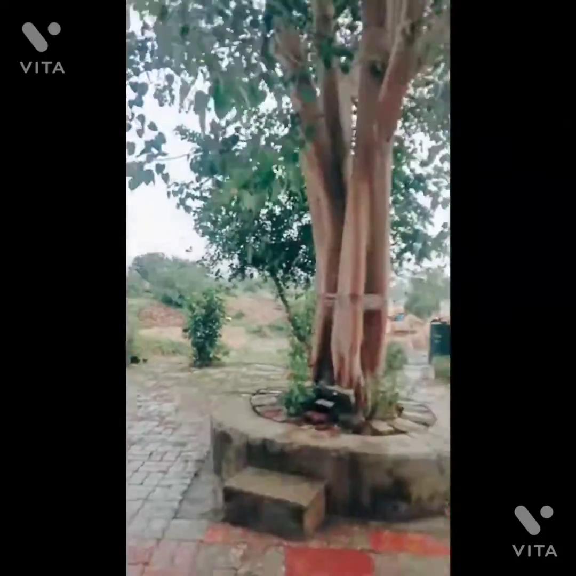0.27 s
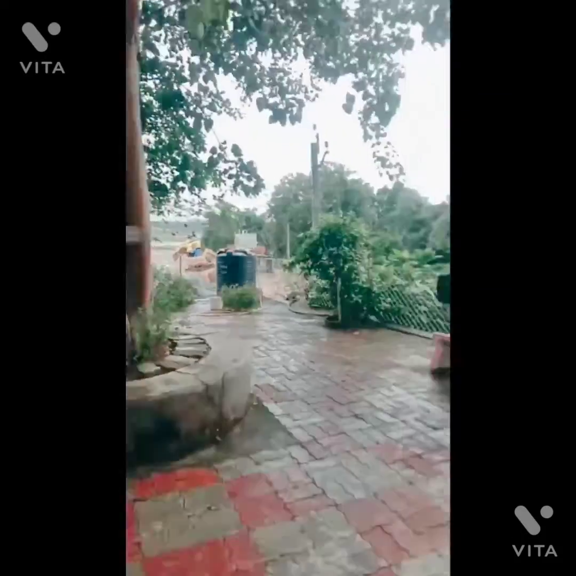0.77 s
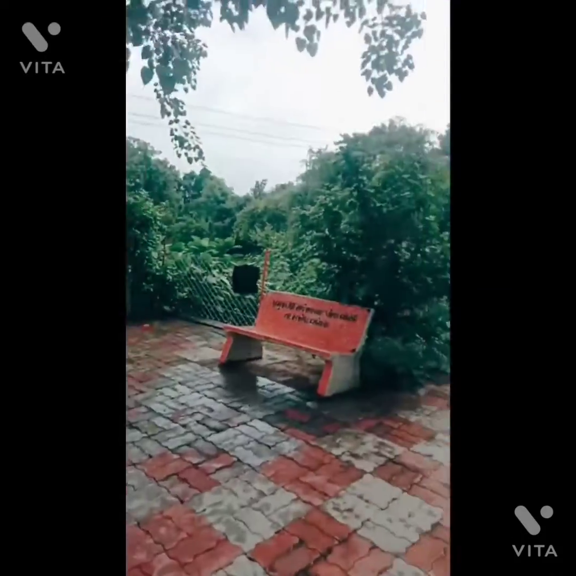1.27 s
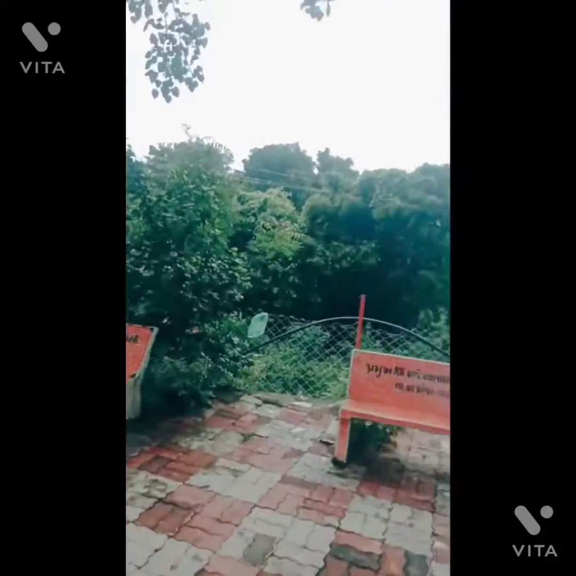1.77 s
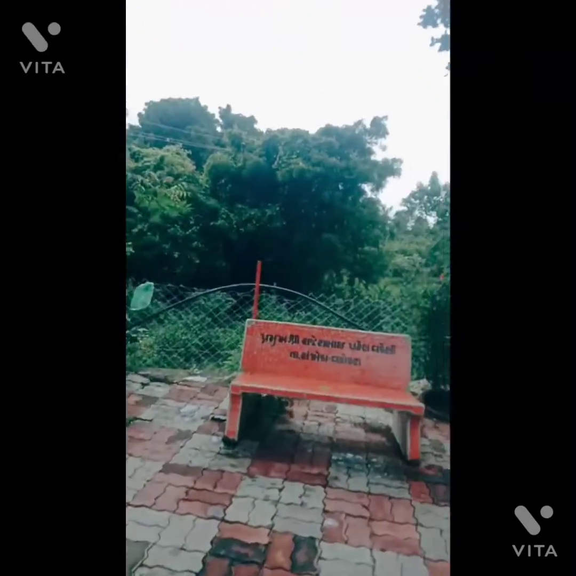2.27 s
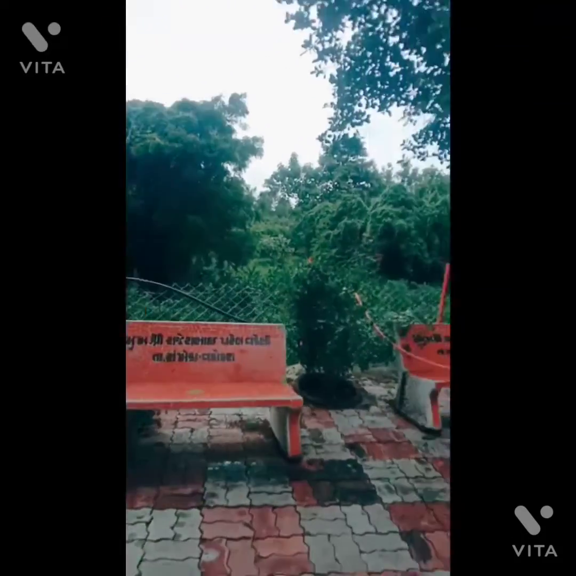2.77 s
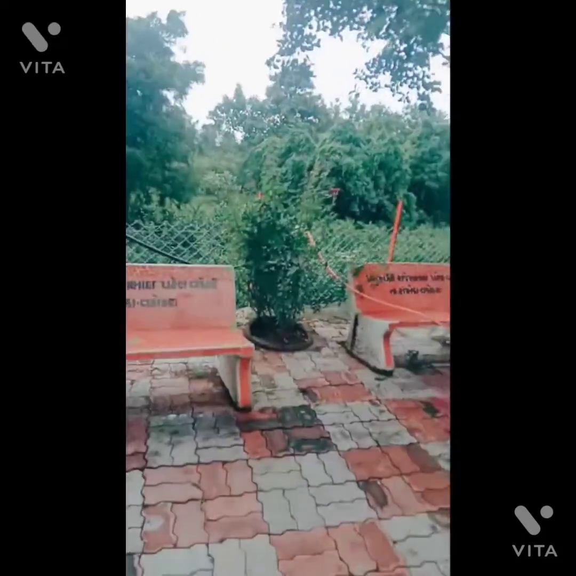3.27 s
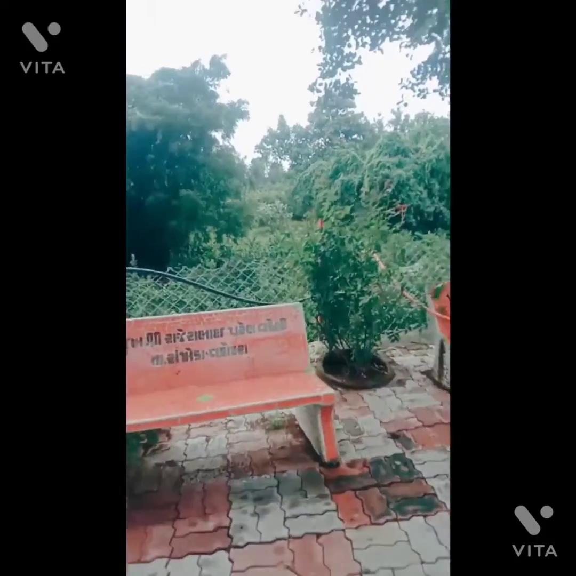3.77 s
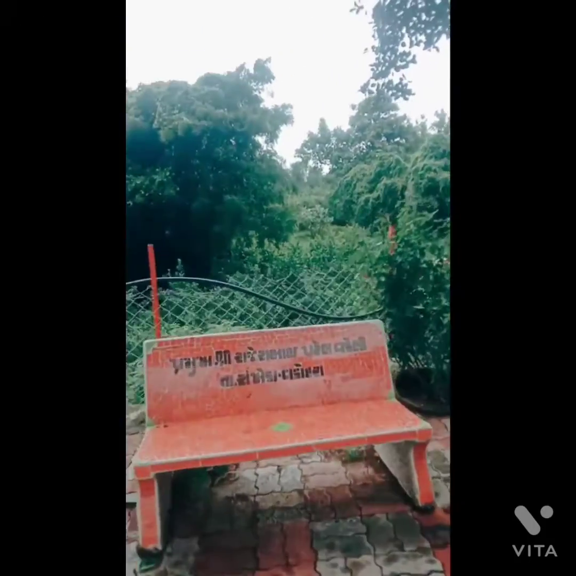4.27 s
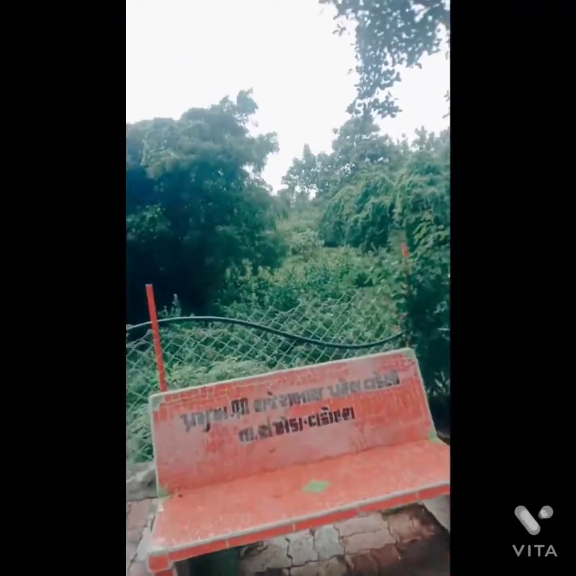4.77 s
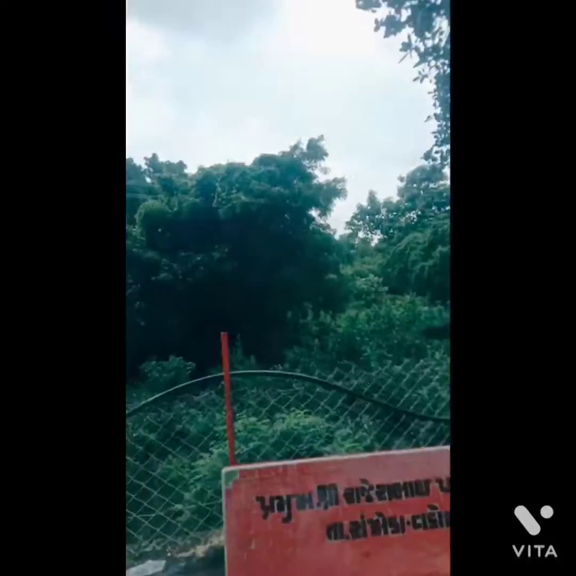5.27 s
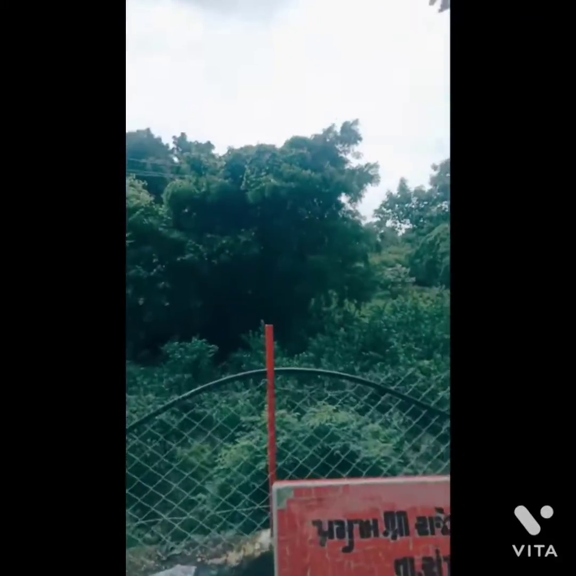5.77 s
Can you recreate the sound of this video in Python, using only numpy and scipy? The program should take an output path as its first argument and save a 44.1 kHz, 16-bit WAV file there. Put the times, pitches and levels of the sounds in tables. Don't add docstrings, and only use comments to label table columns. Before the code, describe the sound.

In a quiet rural garden, a peacock some way off gives five loud, nasal cries, each a short low note leaping to a higher held arch and sliding down. Bushes and trees scatter echoes behind them. Small birds whistle and trill faintly, a shoe scrapes paving, and soft wind thumps a hand-held phone microphone, strongest near the second and third calls.

```python
import sys
import numpy as np
from scipy import signal
from scipy.fft import rfft, irfft, next_fast_len
from scipy.io import wavfile
from scipy.ndimage import uniform_filter1d, map_coordinates

SR = 44100
rng = np.random.default_rng(int(sys.argv[2]) if len(sys.argv) > 2 else 0)


def log_audio(samples):
    frames = np.atleast_2d(samples).T
    limited = np.clip(frames, -1, 1)
    pcm = np.round(limited * 32767).astype(np.int16)
    wavfile.write(sys.argv[1], SR, pcm)


def decibels_to_gain(level_db):
    exponent = np.asarray(level_db, float) / 20
    return 10 ** exponent


N = 265746
LEAD = 26000

# [freq_hz, level_db]
HUSH_COLOUR = [(400, -36.5), (720, -17), (1300, -11.5), (1550, -12.5), (2000, -14.5), (3000, -24.5),
               (4000, -25), (5600, -17.5), (6500, -29), (7200, -23), (8000, -38), (13000, -41),
               (14800, -35), (15400, -33)]
# [centre_hz, width_hz, level_db]
INSECTS = [(1248, 67, -1.5), (2340, 37, -16)]
# [freq_hz, level_db_per_hz]
ROAD_COLOUR = [(150, -25), (250, -1), (400, -1.5), (600, -6.5), (750, -6.5), (1000, -51)]
# [peak_s, swell_db, width_s]
PASSES = [
    (.4, 9.5, 0.43),
    (2.6, 2, .3),
    (4.8, 2.5, .6),
]

# [start_s, peak_db, pitch_hz]
PUFFS = [(0.029, -40.5, 152), (0.409, -40.5, 142), (0.679, -32, 94.4), (0.909, -28.5, 91.6),
         (1.417, -38, 81), (1.601, -28.5, 158.6), (1.605, -18.5, 113), (1.674, -23, 81), (1.828, -21.5, 87),
         (1.911, -27, 103.3), (2.077, -32, 97), (2.219, -30, 88), (2.402, -31.5, 79), (2.504, -37, 84.5),
         (2.643, -43, 159), (2.817, -40.5, 161), (2.818, -37, 101), (2.952, -42.5, 79), (3.345, -48, 145),
         (3.48, -45, 152), (3.618, -52, 113), (3.789, -42.5, 117.3), (4.068, -41.5, 105),
         (4.865, -41, 105.4), (5.186, -44.5, 137.6)]
# [freq_hz, level_db_per_hz]
FLUTTER_COLOUR = [(15, -62.5), (25, -30.5), (62, -13.5), (91, -4.5), (119, -6), (177, -9.5), (260, -29),
                  (340, -67.5), (570, -120)]
# [peak_s, level_db, rise_s, fall_s]
GUSTS = [
    (.1, -51.5, 0.41, 0.6),
    (1.8, -36, 0.15, 0.28),
    (2.92, -48.5, 0.16, .3),
]

# [start_s, scrape_db, length_s, thud_db]
SCUFFS = [
    (0.207, -40, 0.11, -38.5),
    (4.527, -44.5, 0.032, -64),
    (4.816, -56, 0.04, -80),
]
# [freq_hz, level_db_per_hz]
GRIT_COLOUR = [(900, -11.5), (2000, 3), (3500, -4), (5800, -6), (8000, -20.5), (15000, -49.5)]

# [start_s, length_s, first_hz, last_hz, level_db]
WHISTLES = [(.35, 0.16, 2213, 2140, -54), (.51, .08, 610, 600, -54), (1.46, 0.044, 2816, 2374, -46.5),
            (1.68, .03, 2400, 2370, -38.5), (1.77, 0.11, 2260, 2100, -46.5), (2.85, 0.3, 4210, 4066, -65.5),
            (3.03, 0.1, 4720, 4720, -64), (3.33, .09, 4738, 4790, -64), (4.28, 0.068, 6280, 5040, -65.5),
            (4.54, .04, 5570, 5340, -63.5), (5.13, 0.096, 1720, 1905, -67), (5.27, 0.054, 2630, 2750, -69),
            (5.35, 0.053, 5940, 5600, -65)]
# [start_s, length_s, first_hz, last_hz, level_db]
SLURS = [
    (4.95, 0.047, 3890, 3130, -62.5),
    (5.0, 0.068, 4190, 3700, -62.5),
    (5.14, 0.075, 3860, 3250, -62.5),
    (5.4, .04, 5480, 5720, -65),
    (5.702, 0.025, 2760, 2400, -55.5),
]
# [start_s, length_s, first_hz, held_hz, level_db, climb_s]
HELD_WHISTLE = (4.615, .225, 4200, 5115, -66, .031)
# [start_s, end_s, level_db, swell_db]
TRILLS = [
    (1.554, 2.361, -50.5, 0.5),
    (5.438, 6.05, -52, 5),
]
# [delay_s, first_hz, last_hz, length_s, level_db, pitch_fall_over_phrase_0_to_1]
TRILL_TURN = [
    (0, 6500, 4900, .008, 2, .02),
    (.008, 3850, 4020, .035, -3, .08),
    (.026, 5050, 4780, .03, 0, .05),
    (-.02, 7050, 6880, .045, -8, .025),
    (.045, 5900, 5200, .025, -4, .03),
]
TURN_S = .0905

# [start_s, low_note_s, arch_s, top_pitch_hz, level_db]
CRIES = [
    (-.3, 0.13, .5, 784.5, -0.5),
    (.615, 0.13, .42, 785.7, -1),
    (1.44, 0.14, 0.42, 789.2, 0),
    (2.315, .145, .46, 790.8, 0.5),
    (3.345, .14, 0.52, 789.3, 1),
]
# [share_of_note, pitch_over_top_pitch, effort_db, brightness_db]
LOW_NOTE = [(0, 0.78, -9.5, -45), (.19, 0.79, -2, -40.5), (.52, .827, -1.5, -40), (1.001, 0.78, -1.5, -37)]
# [share_of_arch, pitch_over_top_pitch, effort_db, brightness_db]
ARCH = [(0, .945, 1, -53), (.1, .979, 1, -40), (.24, .996, 0, -41.5), (.4, 1.0005, 1, -38),
        (.62, .972, -1, -45), (.78, .877, 0.5, -49.5), (.93, .796, -2.5, -42), (0.998, .752, -13.5, -42.5)]
# [freq_hz, level_db]
CHEST = [(600, -47), (790, -40.5), (1200, -32.5), (1380, -32.5), (1500, -25), (1580, -27.5), (1900, -38.5),
         (2150, -46), (2360, -62)]
# [freq_hz, level_db]
THROAT = [(2300, 17.5), (2600, -4), (3200, -6), (4000, -7), (4700, -11), (5500, -5.5), (6300, -7),
          (7000, -15.5), (8000, -18.5), (10000, -31), (12000, -37.5), (15500, -54.5)]
# [fundamental_low_note_db, fundamental_top_db, fundamental_fall_db,
# partials_4_and_5_db, third_partial_db as the beak opens at the brink]
FACING = [(-4, -0.5, 0, -2.5, 12), (3, -6.5, -2.5, -0.5, 4), (-8, 2, -9, -1.5, 3), (-3, 1, -1, -0.5, 13),
          (3, 0.5, -0.5, 0, 6)]
MOMENTS = [-.2, .05, .35, .62, .85]
# [low_note_db, leap_db, top_db, brink_db, fall_db]
PUSH = [(-4.5, 1.5, -10.5, 0.3, 1.5), (3, 3.5, 0.5, 1.5, 3.5), (2.5, -8, 0, -3.6, -1),
        (-3, 0.5, -1.5, 1.4, -1.5), (0, -3.5, -10.5, -2.8, -0.5)]

# [freq_hz, t60_s]
BUSHES_DECAY = [(600, 0.1), (1500, 0.28), (4000, 0.27), (8000, 0.54), (14000, 0.15)]
# [freq_hz, level_db]
BUSHES_COLOUR = [(600, -7), (1400, -3), (3000, -1), (7000, 0), (14000, -4.5)]
# [freq_hz, t60_s]
TREES_DECAY = [(600, 0.36), (1250, 1.42), (1600, 1.26), (2200, 0.88), (4000, 0.86), (8000, 0.7),
               (14000, 0.1)]
# [freq_hz, level_db]
TREES_COLOUR = [(600, 0), (1250, -2.5), (1600, -6), (2200, 3), (3000, 0), (7000, 6.5), (14000, -29)]
# [freq_hz, level_db]
FOLIAGE = [(600, 3), (1500, 0.5), (2500, -10.5), (5000, -13), (12000, -2)]
# [centre_hz, width_hz, depth_0_to_1]
PORT = (6560, 310, 0.82)


def unit(x):
    return x / np.sqrt(np.mean(x ** 2) + 1e-20)


def along(points, hz):
    f, v = np.transpose(points)
    return np.interp(np.log(hz + 1), np.log(f + 1), v)


def wobble(rate, size=N):
    knots = rng.standard_normal(int(size * rate / SR) + 4)
    return map_coordinates(knots, [np.arange(size) * rate / SR])


def noise(gain, size=N):
    m = next_fast_len(size + 8192)
    spectrum = rfft(rng.standard_normal(m)) * gain(np.fft.rfftfreq(m, 1 / SR))
    return unit(irfft(spectrum, m)[:size])


def sine(hz):
    return np.sin(2 * np.pi * np.cumsum(hz) / SR)


def add(track, s, x):
    part = track[round(s * SR) + LEAD:][:len(x)]
    part += x[:len(part)]


def hush():
    hiss = noise(lambda f: decibels_to_gain(along(HUSH_COLOUR, f)) * (f < 15550), size=N + 512)
    z = signal.stft(hiss, nperseg=512)[2]
    streaks = uniform_filter1d(uniform_filter1d(rng.standard_normal(z.shape), 2, 0), 22, 1)
    patches = uniform_filter1d(uniform_filter1d(rng.standard_normal(z.shape), 9, 0), 9, 1)
    depth = np.clip(2 - np.arange(len(z)) / 48, .25, 1)[:, None]
    texture_db = depth * (3.97 * unit(streaks) + 2.9 * unit(patches))
    leaves = unit(signal.istft(z * decibels_to_gain(texture_db), nperseg=512)[1][:N])
    leaves_db = -53.0 - .5 * np.arange(N) / SR
    drone = noise(lambda f: sum(decibels_to_gain(db) / (1 + (2 * (f - hz) / w) ** 2) for hz, w, db in INSECTS))
    return decibels_to_gain(leaves_db) * leaves + decibels_to_gain(-58.5 + 2.1 * wobble(5.5)) * drone


def road():
    now = np.arange(N) / SR
    db = -62.5 + sum(swell_db * np.exp(-((now - s) / width) ** 2) for s, swell_db, width in PASSES)
    return decibels_to_gain(db + 1.97 * wobble(7)) * noise(lambda f: decibels_to_gain(along(ROAD_COLOUR, f)))


def wind():
    track = np.zeros(N + LEAD)
    t, now = np.arange(SR // 10) / SR, np.arange(N) / SR
    for s, db, hz in PUFFS:
        thump = np.exp(-((t - .02) / 0.0095) ** 2) * np.cos(2 * np.pi * hz * (t - .02))
        add(track, s, decibels_to_gain(db) * thump)
    calm = decibels_to_gain(-53.5 - 0.56 * now)
    gusts = [decibels_to_gain(db) * np.exp(-np.maximum((s - now) / rise, (now - s) / fall)) for s, db, rise, fall in GUSTS]
    strength = np.linalg.norm([calm, *gusts], axis=0)
    flutter = unit(decibels_to_gain(3.94 * wobble(18)) * noise(lambda f: decibels_to_gain(along(FLUTTER_COLOUR, f))))
    return track[LEAD:] + strength * flutter


def scuffs():
    track = np.zeros(N + LEAD)
    t = np.arange(SR // 4) / SR
    for s, db, length, thud_db in SCUFFS:
        grains = noise(lambda f: decibels_to_gain(along(GRIT_COLOUR, f)), size=len(t)) * decibels_to_gain(2.8 * wobble(400, size=len(t)))
        envelope = np.minimum(t / 0.01, 1) / (1 + (t / length) ** 4)
        add(track, s, decibels_to_gain(db) * grains * envelope)
        add(track, s, decibels_to_gain(thud_db + 12 - 60 * t / 0.076) * np.sin(2 * np.pi * 590 * t))
    return track


def whistle(length, first_hz, last_hz, db, droops):
    t = np.arange(0, length, 1 / SR)
    u = t / length
    fade = np.clip(np.minimum(t, length - t) / 0.0047, 0, 1)
    if droops:
        done, shape_db = u ** 1.924, -4 * (2 * u - 1) ** 2
    else:
        done, shape_db = 1 - (1 - u) ** 2.6, 10.5 * (.5 - u)
    quaver = 1 + .006 * wobble(90, size=len(t))
    hz = (first_hz + (last_hz - first_hz) * done) * quaver
    return fade * decibels_to_gain(db + 5.0 + shape_db + 1.9 * wobble(60, size=len(t))) * sine(hz)


def held_whistle(length, first_hz, held_hz, db, climb):
    t = np.arange(0, length, 1 / SR)
    hz = held_hz - (held_hz - first_hz) * np.exp(-(t / climb) ** 1.4 / 2)
    swell = np.sin(np.pi * t / length) ** 0.59
    return decibels_to_gain(db + 8.0 + 2.6 * wobble(57, size=len(t))) * swell * sine(hz)


def trill_note(first_hz, last_hz, length, pitch_scale):
    u = np.arange(int(length * SR)) / (length * SR)
    hz = (last_hz + (first_hz - last_hz) * (1 - u) ** 2) * pitch_scale
    burr = 1 + .8 * wobble(260, size=len(u))
    return np.minimum(u * 8, 1) * (1 - u) * burr * sine(hz)


def songbirds():
    track = np.zeros(N + LEAD)
    for table, droops in ((WHISTLES, False), (SLURS, True)):
        for s, *note in table:
            add(track, s, whistle(*note, droops))
    add(track, HELD_WHISTLE[0], held_whistle(*HELD_WHISTLE[1:]))
    for start, end, db, swell_db in TRILLS:
        for s in np.arange(start, end, TURN_S):
            early = .5 - (s - start) / (end - start)
            for delay, first_hz, last_hz, length, note_db, sink in TRILL_TURN:
                note = trill_note(first_hz, last_hz, length, 1 + sink * early)
                level_db = db + note_db - swell_db * early + rng.normal(0, 1.6)
                add(track, s + delay, decibels_to_gain(level_db) * note)
    return track


def phrase(rows, smooth, edge):
    s, *cols = np.transpose(rows)
    t = np.arange(s[0], s[-1], 1 / SR)
    fade = np.clip(np.minimum(t - s[0], s[-1] - t) / edge, 0, 1)
    width = int(smooth * SR) + 1
    return fade, [uniform_filter1d(np.interp(t, s, c), width, mode="nearest") for c in cols]


def cry(start, low_s, arch_s, top_hz, level_db, facing, push):
    arch_at = low_s + .043
    rows = [(u * low_s, *rest) for u, *rest in LOW_NOTE]
    rows += [(arch_at + u * arch_s, *rest) for u, *rest in ARCH]
    fade, (pitch, effort_db, high_db) = phrase(rows, smooth=0.025, edge=0.011)
    hz = pitch * top_hz
    size = len(hz)
    glide = uniform_filter1d(np.clip(np.abs(np.gradient(hz)) * SR / 600 - .6, 0, 1), 700)
    hz = hz * (1 + 0.00044 * wobble(45.1, size) + 0.01 * glide * wobble(150, size))
    k = np.arange(1, 21)[:, None]
    slack_db = 2.303 * np.clip(1 - hz / 785, 0, 1) * (k * hz / 1000) ** 2
    gain = decibels_to_gain(along(THROAT, k * hz) - slack_db) * (k * hz < SR / 2.8)
    gain[:3] = decibels_to_gain(along(CHEST, k[:3] * hz) + effort_db)
    share = (np.arange(size) / SR - arch_at) / arch_s
    fading_db = 2.5 * wobble(17.6, size)
    gain[0] *= decibels_to_gain(np.interp(share, MOMENTS[::2], facing[:3]) + fading_db)
    gain[1] *= decibels_to_gain(np.interp(share, MOMENTS, push))
    gain[2] *= decibels_to_gain(facing[4] * np.interp(share, MOMENTS[2:], [0, 1, 0]))
    gain[3:5] *= decibels_to_gain(facing[3])
    gain[3:] *= decibels_to_gain(high_db) / np.linalg.norm(gain[3:], axis=0)
    flicker_db = np.minimum(0.6 + 0.64 * k, 2.5) * np.array([wobble(36.17, size) for _ in k])
    phase = 2 * np.pi * (k * np.cumsum(hz) / SR + rng.random(k.shape))
    partials = gain * decibels_to_gain(flicker_db) * np.sin(phase)
    return np.sqrt(2) * decibels_to_gain(level_db) * fade * np.sum(partials, axis=0)


def peacock():
    track = np.zeros(N + LEAD)
    for row, facing, push in zip(CRIES, FACING, PUSH):
        add(track, row[0], cry(*row, facing, push))
    return track


def screened(x):
    m = next_fast_len(len(x))
    return irfft(rfft(x, m) * decibels_to_gain(along(FOLIAGE, np.fft.rfftfreq(m, 1 / SR))), m)[:len(x)]


def echoes(x, decay, colour, gap, sway):
    size = SR + SR // 2
    scatter = rng.standard_normal((2, size)) * decibels_to_gain(3.43 * wobble(35.8, size))
    hz, t, z = signal.stft(scatter, SR, nperseg=256)
    tail_db = along(colour, hz)[:, None] - 60 * t / along(decay, hz)[:, None]
    tails = signal.istft(z * decibels_to_gain(tail_db), SR, nperseg=256)[1]
    tails = np.pad(tails / np.linalg.norm(tails[0]), ((0, 0), (int(gap * SR), 0)))
    first, second = signal.fftconvolve(x[None], tails, axes=1)[:, :len(x)]
    turn = sway * wobble(9, size=len(x))
    return np.cos(turn) * first + np.sin(turn) * second


def scene():
    loud, small, feet = peacock(), songbirds(), scuffs()
    to_bushes = decibels_to_gain(-0.5) * loud + decibels_to_gain(-1.0) * small
    to_trees = decibels_to_gain(-9.5) * loud + decibels_to_gain(-9.5) * small + decibels_to_gain(-14) * feet
    near = echoes(to_bushes, BUSHES_DECAY, BUSHES_COLOUR, gap=.004, sway=1.135)
    far = echoes(to_trees, TREES_DECAY, TREES_COLOUR, gap=.03, sway=3.56)
    garden = screened(loud) + decibels_to_gain(2.5) * small + feet + near + far
    return (garden[LEAD:] + wind() + road() + hush())[None]


def band_limit(x):
    return signal.sosfilt(signal.butter(12, 16570, fs=SR, output="sos"), x)


def record(dry):
    hz, width_hz, depth = PORT
    m = next_fast_len(N + 4096)
    offset = (np.fft.rfftfreq(m, 1 / SR) - hz) / width_hz * 2
    dip = 1 - np.clip(depth, 0, 1) * np.exp(-offset ** 2)
    mix = irfft(rfft(dry, m) * dip, m)[:, :N]
    return band_limit(mix)


dry = scene()
out = record(dry)
log_audio(out)
```